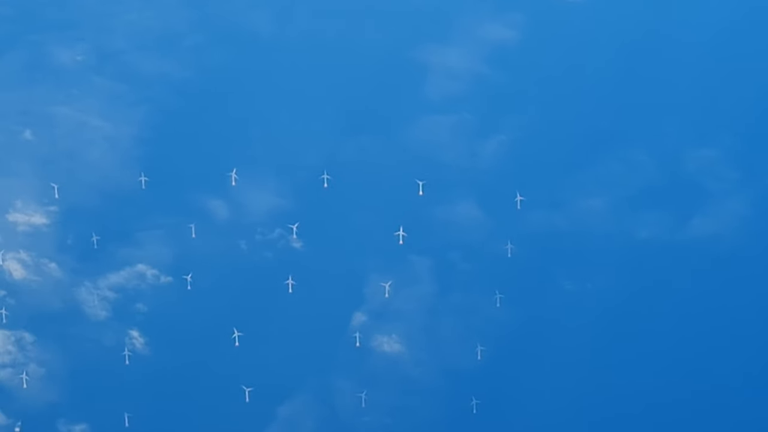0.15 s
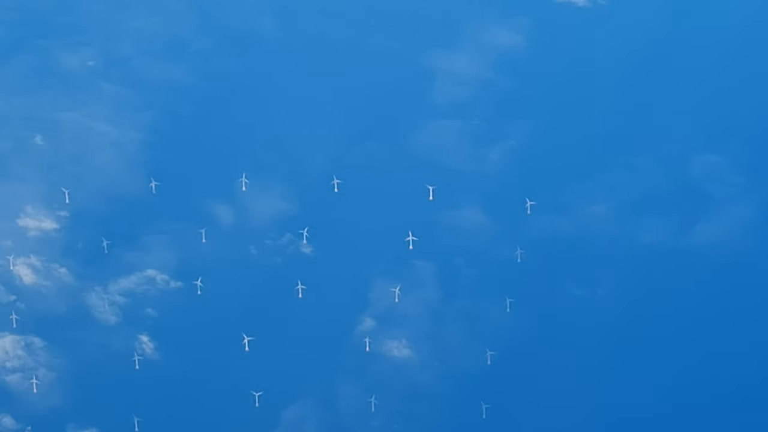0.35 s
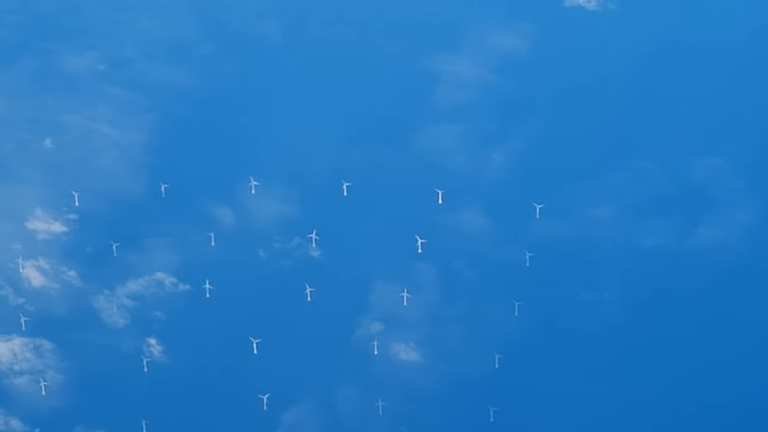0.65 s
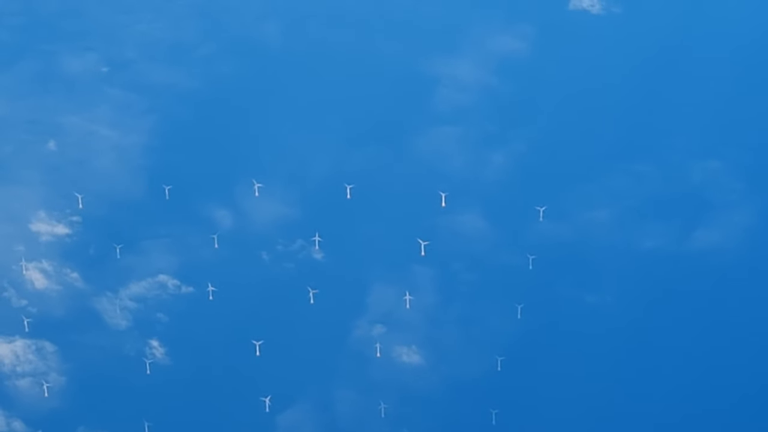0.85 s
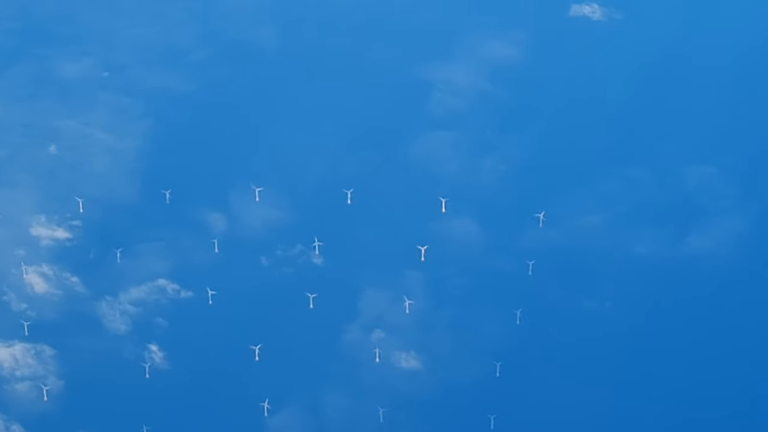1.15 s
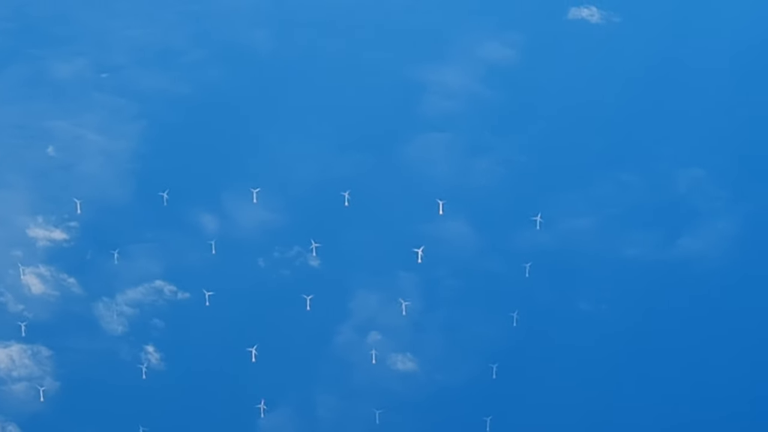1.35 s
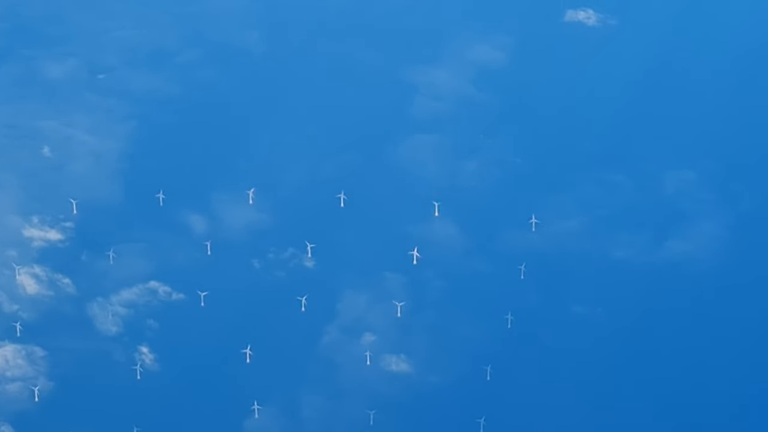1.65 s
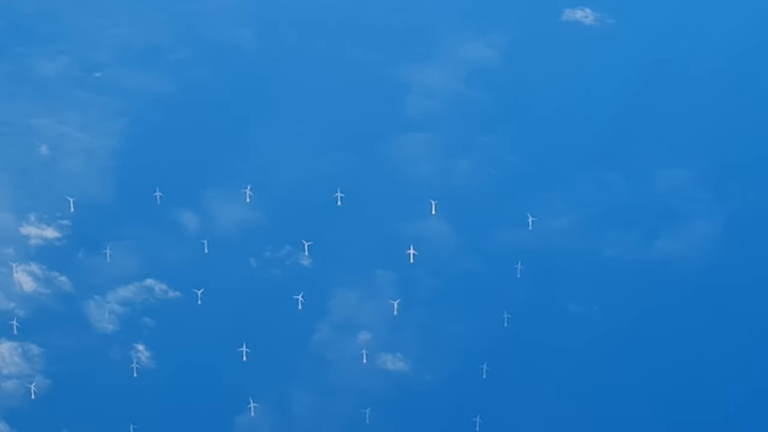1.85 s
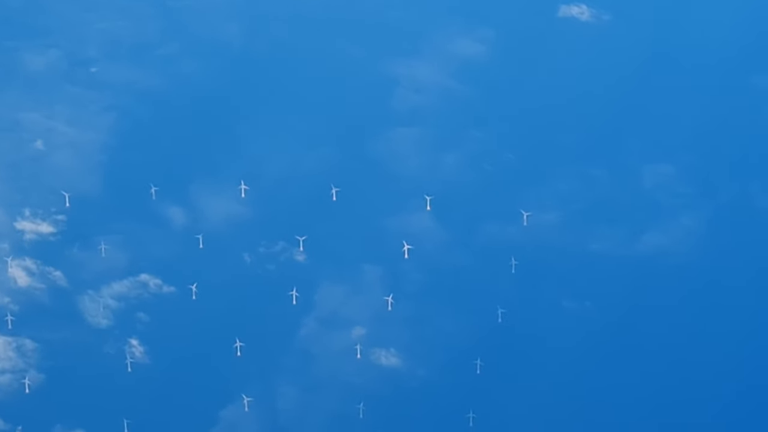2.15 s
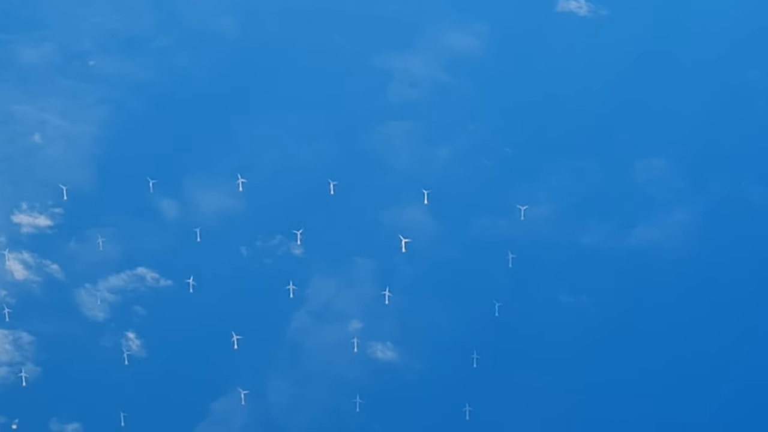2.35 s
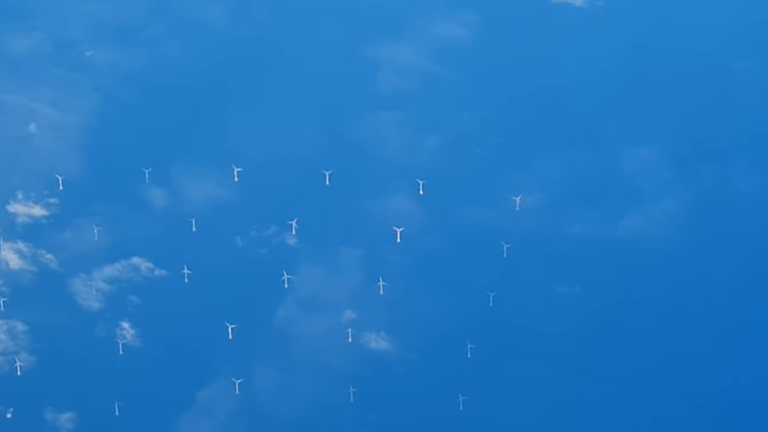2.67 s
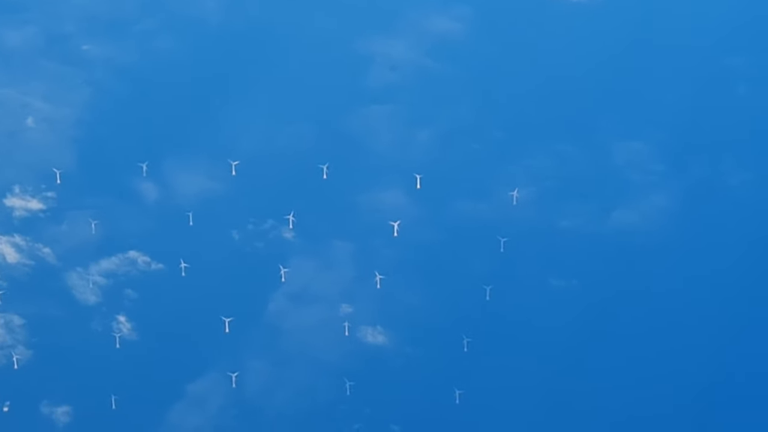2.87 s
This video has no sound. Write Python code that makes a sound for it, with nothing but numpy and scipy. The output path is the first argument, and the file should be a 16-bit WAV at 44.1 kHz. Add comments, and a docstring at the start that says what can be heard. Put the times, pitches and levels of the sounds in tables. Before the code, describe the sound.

Steady deep roar of air and engines inside an airliner in flight, with a faint ventilation hiss; close to the microphone a small plastic click comes early, a short creak midway, and faint ticks at the end.

```python
"""Inside an airliner in cruise, beside a window. First comes the steady roar of air over the hull: fluttering,
coloured noise. A rough engine drone, a sine wavering in pitch, fades in under it, while the ventilation
hisses and faintly whines as noise in narrow resonances. Close by, something small and plastic clicks
(damped modes and a noise crack), rubs softly, gives a short creak (a run of noise slips), then ticks faintly."""
import sys
import numpy as np
from scipy import signal
from scipy.fft import rfft, irfft
from scipy.io import wavfile

SR = 44100
rng = np.random.default_rng(int(sys.argv[2]) if len(sys.argv) > 2 else 0)


def dump_mix(stems):
    """Bounce the given channels to the path in sys.argv[1] as a 16-bit WAV at rate SR."""
    frames = np.atleast_2d(stems).T  # one column per channel
    limited = np.clip(frames, -1, 1)  # hard clip at full scale
    pcm = np.round(limited * 32767).astype(np.int16)
    wavfile.write(sys.argv[1], SR, pcm)


N = 132741


def undb(db):
    """Level law: amplitude gain is ten to the power of decibels over twenty."""
    return 10 ** (np.asarray(db) / 20)


def unit(x):
    """Normalisation: scale a signal to an rms of 1."""
    return x / np.sqrt(np.mean(x ** 2))


def freqs():
    """Fourier analysis: frequency of each spectral bin [Hz], held at 1 or above."""
    return np.maximum(np.arange(N // 2 + 1) * SR / N, 1)


def colour(x, points):
    """Linear filtering: weight the spectrum by (frequency [Hz], gain [dB]), joined over log frequency."""
    hz, gain_db = np.array(points, float).T
    curve_db = np.interp(np.log(freqs()), np.log(hz), gain_db)
    return irfft(rfft(x) * undb(curve_db), N)


def resonance(hz, width_hz):
    """Resonance: white noise kept near one frequency, 12 dB down at width_hz to either side; rms 1."""
    noise = rfft(rng.standard_normal(N))
    detuning = (freqs() - hz) / width_hz
    return unit(irfft(noise / (1 + detuning ** 2) ** 2, N))


def walk(rate_hz):
    """Random modulation: noise above 1 Hz with a Gaussian roll-off, 1/e at rate_hz; rms 1."""
    noise = rfft(rng.standard_normal(N))
    rolloff = np.exp(-(freqs() / rate_hz) ** 2) * (freqs() > 1)
    return unit(irfft(noise * rolloff, N))


def envelope(t, points):
    """Amplitude envelope: gain through (time [s], level [dB]) points, straight in dB between them."""
    times, level_db = np.array(points).T
    return undb(np.interp(t, times, level_db))


def pan(left_db):
    """Level-difference stereo: gains of left and right that differ by left_db."""
    return undb(np.array([[left_db], [-left_db]]) / 2)


FLUTTER_DB, FLUTTER_RATE_HZ = 0.65, 21  # rms depth and roll-off of each band's flutter


def turbulence(count=9):
    """Band-wise modulation: two white noises whose octave bands each flutter independently."""
    spectra = rfft(rng.standard_normal((2, N)))
    octave = np.clip(np.log2(SR / 2 / freqs()), 0, count - 1)  # octaves below half the sample rate
    out = np.zeros((2, N))
    for k in range(count):
        band = irfft(spectra * np.maximum(1 - abs(octave - k), 0), N)
        out += band * undb(FLUTTER_DB * walk(FLUTTER_RATE_HZ))
    return out


# spectrum of the roar shared by both sides: (frequency [Hz], spectral level [dB per Hz])
ROAR_MID_SPECTRUM = [(12, -46), (24, -21), (32, -9), (42, -10.5), (62, -6), (78, -8), (92, -12.5),
                     (118, -4), (132, -7), (150, -1.5), (192, -9), (227, -3.5), (276, -7), (320, -3),
                     (408, -8.5), (443, -12), (510, -15.5), (554, -10), (620, -16), (674, -15.5),
                     (996, -19), (1110, -25), (1270, -25.5), (1400, -29.5), (1790, -32), (1950, -38.5),
                     (2120, -35.5), (2430, -42.5), (2960, -42), (4500, -50.5), (5600, -54.5), (6290, -59.5),
                     (11500, -59), (13500, -63), (15800, -67)]
# spectrum of the roar in opposite phase on the two sides: (frequency [Hz], spectral level [dB per Hz])
ROAR_SIDE_SPECTRUM = [(12, -46), (24, -18), (65, -5.5), (98, -22), (153, -1.5), (187, -10), (215, -5),
                      (268, 1), (326, -12), (365, -1), (469, -10), (674, -2), (1250, -9.5), (2060, -25.5),
                      (2650, -25.5), (3040, -29.5), (6650, -45.5), (11000, -45.5), (15800, -53)]
# gain of the deep rumble: (time [s], level [dB])
RUMBLE_LEVEL = [(0, -1.5), (1.25, -1), (1.5, 1.5), (1.9, -3), (3.0, -2)]
# lean of the roar between the sides: (frequency [Hz], left minus right [dB])
ROAR_LEAN_CURVE = [(50, -2.5), (160, 1), (390, -1.5), (660, 1), (800, -2.5), (1080, -3.5), (1250, -7),
                   (1650, 1.5), (2900, -1.5), (4000, -1), (4600, 2), (7700, 2.5), (9800, -2.5), (14000, 3)]
ROAR_MID_DB, ROAR_SIDE_DB = -18.5, -26.5  # levels before rumble, lean and swell
RUMBLE_TOP_HZ = 98
SWELL_DB, SWELL_RATE_HZ = 0.82, 1  # rms depth and roll-off of the overall swell


def roar(t):
    """Aerodynamic noise as mid and side: rumble is alike on both sides, treble is diffuse."""
    mid_noise, side_noise = turbulence()
    mid = undb(ROAR_MID_DB) * unit(colour(mid_noise, ROAR_MID_SPECTRUM))
    rumble = irfft(rfft(mid) / (1 + (freqs() / RUMBLE_TOP_HZ) ** 8), N)
    mid = mid + rumble * (envelope(t, RUMBLE_LEVEL) - 1)  # add only the change in rumble
    side = undb(ROAR_SIDE_DB) * unit(colour(side_noise, ROAR_SIDE_SPECTRUM))
    sides = []
    for sign in (1, -1):  # left, right
        lean = [(hz, sign * db / 2) for hz, db in ROAR_LEAN_CURVE]
        sides.append(colour(mid + sign * side, lean))
    return np.array(sides) * undb(SWELL_DB * walk(SWELL_RATE_HZ))


# envelope of the engine drone: (time [s], level [dB])
DRONE_ENVELOPE = [(0, -45), (.24, -24), (.3, -19.5), (.42, -36), (.51, -17), (.57, -30), (.62, -25.5),
                  (.91, -32.5), (.96, -23.5), (1.24, -29.5), (1.35, -23.5), (1.68, -24), (2.0, -33.5),
                  (2.17, -30), (2.27, -36), (2.32, -20), (2.39, -44), (2.52, -28), (3.01, -31)]
DRONE_HZ, DRONE_WAVER_HZ = 160, 6.5  # centre pitch, rms pitch waver
DRONE_BEAT_DB, DRONE_RATE_HZ = 2, 8  # rms beating depth, roll-off of waver and beating


def engines(t):
    """Frequency and amplitude modulation: a structure-borne drone wavers in pitch and beats unevenly."""
    hz = DRONE_HZ + DRONE_WAVER_HZ * walk(DRONE_RATE_HZ)
    tone = np.sin(2 * np.pi * np.cumsum(hz) / SR)
    throb = unit(tone * undb(DRONE_BEAT_DB * walk(DRONE_RATE_HZ)))
    return throb * envelope(t, DRONE_ENVELOPE)


# duct resonances: (frequency [Hz], width [Hz], level [dB], lag of the right side [ms])
DUCT_RESONANCES = [(532, 32, -39, 0.37), (1796, 16, -58, 0.48), (2975, 410, -54.5, 0.68),
                   (3040, 60, -61, 0.62)]
# pitches of the fan whines: frequency [Hz]
WHINE_PITCHES = (2159.5, 4319, 4579, 8638)
# balance of the fan whines, in the same order: (level [dB], left minus right [dB])
WHINE_LEVELS = [(-62, -10), (-73, -4), (-76.5, 0), (-83, -2)]
# brief narrow swells in the hiss: (centre time [s], half length [s], frequency [Hz], width [Hz], level [dB])
HISS_SWELL_BANDS = [(.92, 0.054, 9700, 1300, -60.5), (2.21, .045, 1840, 50, -40.5),
                    (2.62, 0.022, 4200, 500, -54), (2.98, .02, 11500, 3500, -58)]
WHINE_WIDTH_HZ = 6


def ventilation(t):
    """Resonance under broadband excitation: air rings the ducts and swells; fans add unsteady whines."""
    out = np.zeros((2, N))
    for hz, width_hz, db, lag_ms in DUCT_RESONANCES:
        air = undb(db) * resonance(hz, width_hz)
        delayed = np.interp(t - lag_ms / 1000, t, air)
        out += np.array([air, delayed])
    for hz, (db, left_db) in zip(WHINE_PITCHES, WHINE_LEVELS):
        out += undb(db) * resonance(hz, WHINE_WIDTH_HZ) * pan(left_db)
    for centre, half_s, hz, width_hz, db in HISS_SWELL_BANDS:
        swell = undb(db) * np.exp(-((t - centre) / half_s) ** 2)
        hiss = np.array([resonance(hz, width_hz) for _ in range(2)])  # independent on each side
        out += swell * hiss
    return out


ATTACK_S = .0003  # time constant of every plastic onset


def burst(t, start, decay_s):
    """Impact envelope: a sharp attack and an exponential decay with time constant decay_s."""
    age = np.maximum(t - start, 0)
    return (1 - np.exp(-age / ATTACK_S)) * np.exp(-age / decay_s)


def crackle(spectrum):
    """Surface noise: coloured noise of plastic, independent on each side; rms 1."""
    return unit(colour(rng.standard_normal((2, N)), spectrum))


# plastic clicks: (time [s], level [dB])
CLICK_TIMES = [(.3085, -35), (2.9735, -48), (2.982, -52)]
# spectrum of a click's noisy crack: (frequency [Hz], spectral level [dB per Hz])
CRACK_SPECTRUM = [(2000, -5), (3500, 0), (6000, -3), (7500, 0), (9500, -3), (11000, 2), (15500, -2.5)]
# modes that a click rings: (frequency [Hz], level [dB], time to decay by 60 dB [s])
RINGING_MODES = [(3450, -6, .045), (5280, -8, .045), (7700, -16, .06), (8100, -14, .06), (10650, -9, .025),
                 (11250, -6.5, .022), (11600, -8, .028), (14200, -15, .03)]
CRACK_DB, CRACK_DECAY_S = 0.5, .0058  # relative to the click's level; time constant


def clicks(t):
    """Impact excitation: a bright noise crack over a few damped modes that die away quickly."""
    out = np.zeros((2, N))
    for start, db in CLICK_TIMES:
        ring = np.zeros(N)
        for hz, mode_db, t60 in RINGING_MODES:
            mode = np.sin(2 * np.pi * hz * (t - start))
            ring += undb(mode_db) * mode * burst(t, start, t60 / np.log(1000))  # t60 to time constant
        crack = undb(CRACK_DB) * crackle(CRACK_SPECTRUM) * burst(t, start, CRACK_DECAY_S)
        out += undb(db) * (ring + crack)
    return out


# spectrum of the rubbing: (frequency [Hz], spectral level [dB per Hz])
RUB_SPECTRUM = [(900, -12), (2200, 3), (3100, 9), (4500, 4), (5600, 2), (6800, 0), (9400, -2.5),
                (12300, -4), (15500, -8)]
# soft rubbing before the grain: (centre time [s], half length [s], level [dB])
RUB_SWELLS = [(1.34, .03, -57), (1.69, 0.07, -55), (1.823, 0.056, -51)]
# spectrum of a crisp slip: (frequency [Hz], spectral level [dB per Hz])
CRISP_SPECTRUM = [(2000, -7), (3200, 2), (6000, 1.5), (8500, 0), (13000, -1), (15500, -4)]
# spectrum of a dull slip: (frequency [Hz], spectral level [dB per Hz])
DULL_SPECTRUM = [(1200, -12), (2400, 1.5), (3000, 7), (4000, -1), (5600, -0.5), (7000, -13), (15500, -34)]
# slips before the grain: (time [s], level [dB], decay time constant [s], crisp share of power [0-1])
CREAK_SLIPS = [(1.794, -45, .014, 0.65), (1.8005, -46, .009, 0.3), (1.8158, -40, .006, 0.35),
               (1.8212, -39.5, .008, 0.15), (1.837, -37.5, .006, 0.75), (1.8422, -36, .007, 0.12),
               (1.851, -44, .008, 0.25)]
GRAIN_DB, GRAIN_RATE_HZ = 3, 600  # rms depth and roll-off of the graininess


def creak(t):
    """Stick-slip friction: soft grainy rubbing breaks into a quick run of crisp and dull slips."""
    grain = unit(undb(GRAIN_DB * walk(GRAIN_RATE_HZ)))
    rubbing = np.zeros(N)
    for centre, half_s, db in RUB_SWELLS:
        rubbing += undb(db) * np.exp(-((t - centre) / half_s) ** 2)
    out = crackle(RUB_SPECTRUM) * rubbing
    crisp, dull = crackle(CRISP_SPECTRUM), crackle(DULL_SPECTRUM)
    for start, db, decay_s, share in CREAK_SLIPS:
        blend = np.sqrt(share) * crisp + np.sqrt(1 - share) * dull
        out += undb(db) * burst(t, start, decay_s) * blend
    return grain * out


def scene():
    """Superposition: the cabin as heard from the seat, with the plastic slightly to the left."""
    t = np.arange(N) / SR
    cabin = roar(t) + engines(t) + ventilation(t)
    plastic = (clicks(t) + creak(t)) * pan(2)  # left minus right [dB]
    return cabin + plastic


TOP_HZ = 15800


def record(dry):
    """Band limitation: a steep elliptic low-pass removes everything much above TOP_HZ."""
    # order 12, 0.1 dB passband ripple, 90 dB stopband attenuation
    low_pass = signal.ellip(12, .1, 90, TOP_HZ, fs=SR, output="sos")
    return signal.sosfilt(low_pass, dry)


dry = scene()
out = record(dry)
dump_mix(out)
```